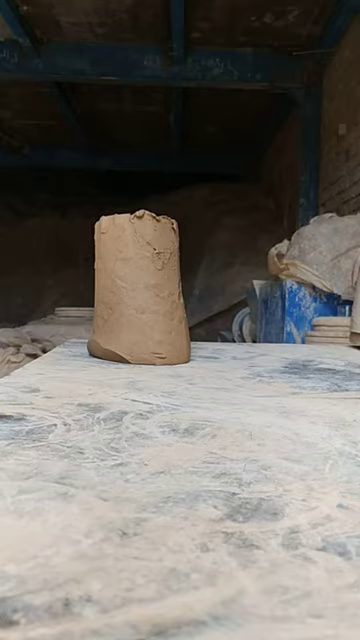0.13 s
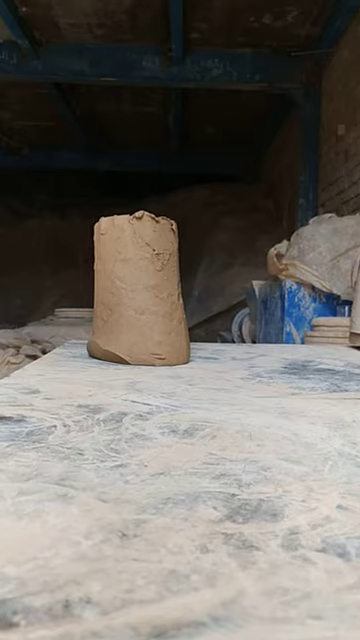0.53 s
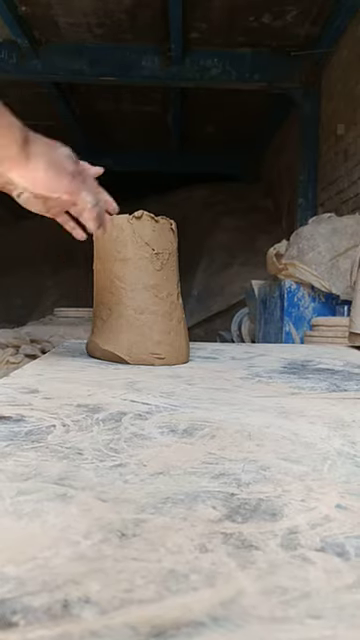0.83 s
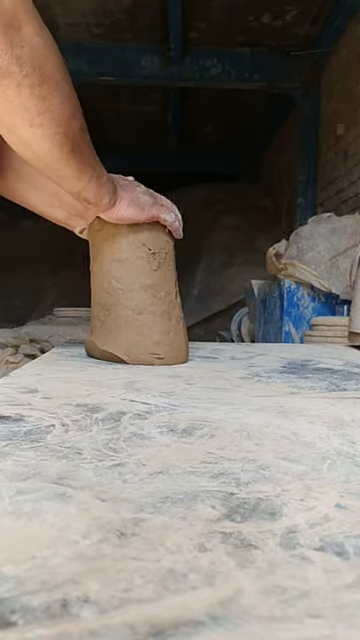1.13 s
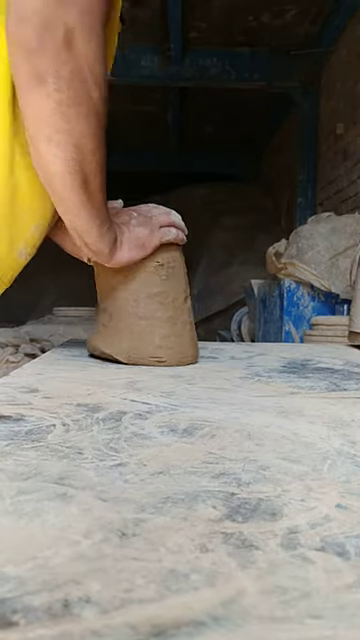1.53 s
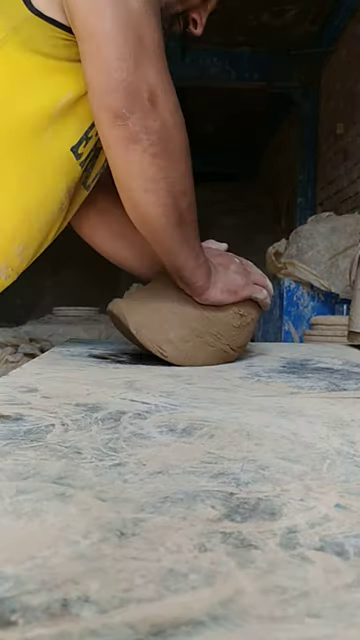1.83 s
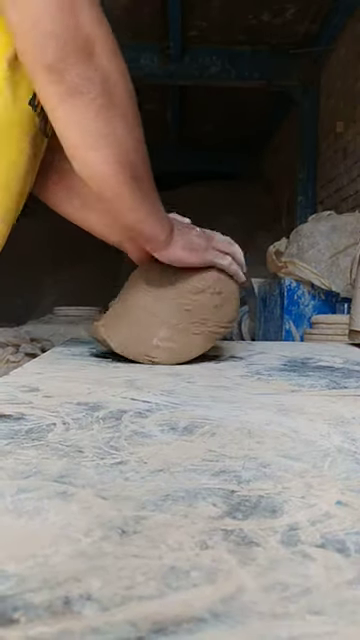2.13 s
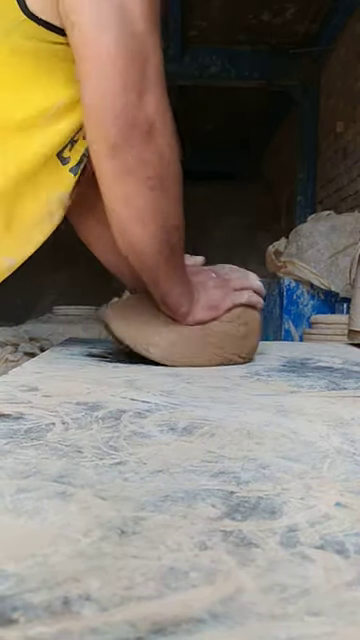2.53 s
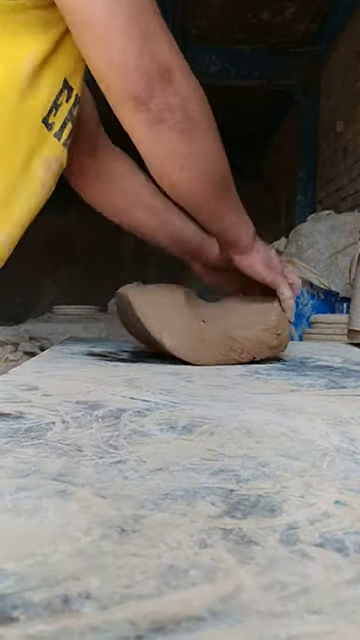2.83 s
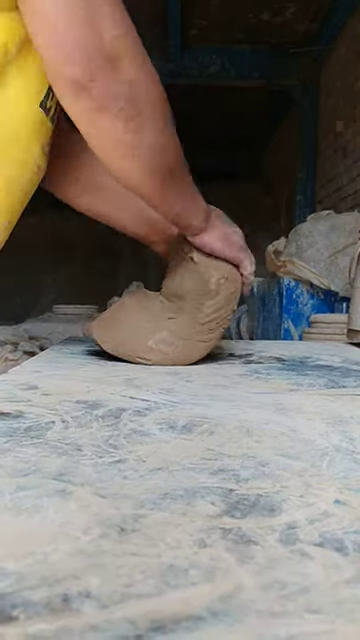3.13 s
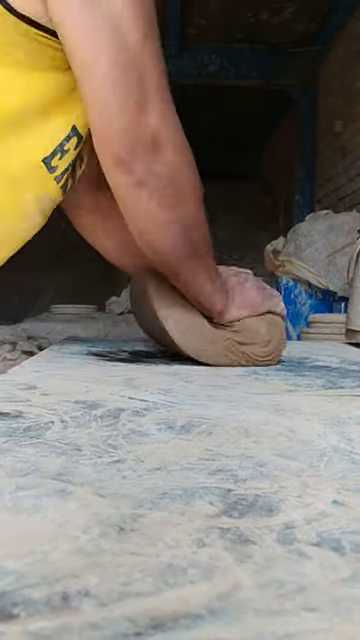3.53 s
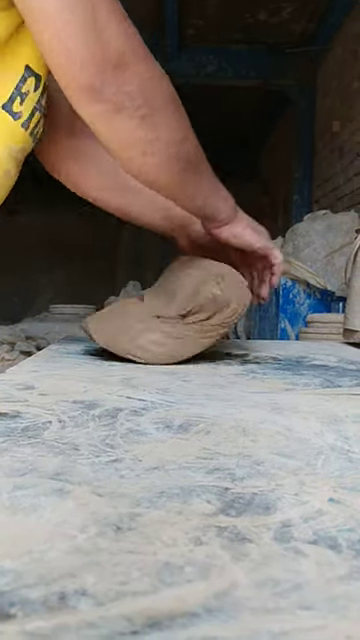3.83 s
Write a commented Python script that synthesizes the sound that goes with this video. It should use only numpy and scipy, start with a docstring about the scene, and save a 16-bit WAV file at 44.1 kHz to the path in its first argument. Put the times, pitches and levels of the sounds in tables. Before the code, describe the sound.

Wet clay being kneaded by hand, with soft pats and squelches over a low workshop hum.

```python
"""Kneading wet clay

Two hands knead a lump of wet clay on a table, which rumbles softly under the pushes.
Palms pat the lump and slide over it; the sticky clay squelches and lets go with small snaps.
Behind them a workshop hums and hisses steadily, cutting in after a moment of silence."""
import sys
import numpy as np
from scipy import signal
from scipy.fft import rfft, irfft
from scipy.io import wavfile

SR = 44100
rng = np.random.default_rng(int(sys.argv[2]) if len(sys.argv) > 2 else 0)


def persist_wave(psi):
    """Save psi, clipped to +-1, as 16-bit WAV."""
    counts = np.round(np.clip(psi, -1, 1) * 32767).astype(np.int16)
    wavfile.write(sys.argv[1], SR, np.atleast_2d(counts).T)


N = 176400

# How alike left and right are in the room: pitch_hz, likeness (1 = the same)
ROOM_LIKENESS = [(30, 1), (90, 0.81), (170, 0.94), (330, 0.69), (600, 0.42), (1200, 0.2), (3000, 0.064),
                 (12000, 0.033)]
# The tone of skin on clay: pitch_hz, level_db
SKIN_TONE = [(200, -1), (700, -1), (1500, -2), (3000, 0.5), (4500, 1), (6000, 0), (8800, 5), (9800, 3.5),
             (11000, -6), (14000, -16)]
HAND_LIKENESS = 0.12


def amp(db):
    """Turns decibels into a gain."""
    return 10 ** (np.asarray(db) / 20)


def unit(x):
    """Scales a signal to an average power of 1."""
    return x / np.sqrt(np.mean(x ** 2) + 1e-20)


def read(points, hz):
    """Reads between the rows of a table, on a scale of octaves."""
    pitches, values = np.transpose(points)
    return np.interp(np.log(hz + 1), np.log(pitches + 1), values)


def sides(pan_db):
    """Left and right gains of constant power; a positive pan_db is louder on the left."""
    return unit(amp(np.array([[pan_db], [-pan_db]]) / 2))


def add(mix, start_s, sound):
    """Lays a stereo sound into the mix."""
    part = mix[:, round(start_s * SR):][:, :sound.shape[1]]
    part += sound[:, :part.shape[1]]


def pair(noise, likeness):
    """Makes two unrelated channels partly alike."""
    return np.array([noise[0], likeness * noise[0] + np.sqrt(1 - likeness ** 2) * noise[1]])


def grit(size, per_s, spread_db, smooth_share):
    """Noise that is partly smooth, partly broken into tiny slips of uneven strength."""
    slipping = rng.random(size) < per_s / SR
    slips = slipping * amp(spread_db * np.minimum(rng.exponential(1, size), 3))
    noise = pair(rng.standard_normal((2, size)), HAND_LIKENESS)
    return noise * np.sqrt(smooth_share + (1 - smooth_share) * unit(slips) ** 2)


def stroke(t, half_rise, fall):
    """Swells up to time zero, then dies away."""
    return np.where(t < 0, np.cos(np.pi / 2 * t / (2 * half_rise)) ** 2, np.exp(-abs(t) / fall))


def workshop():
    """Steady room noise that hums in narrow bands, each with its own place from left to right."""
    # The broad noise of the room: pitch_hz, level_db (per Hz)
    air = [(15, -85), (80, -77), (125, -67), (200, -69), (280, -78.5), (330, -83), (430, -81.5), (540, -81),
           (680, -90), (1200, -92), (1800, -96), (2500, -99), (3100, -101), (3700, -103), (5400, -105),
           (6300, -108.5), (7100, -105), (8000, -103.5), (9600, -105), (10500, -113), (12500, -119),
           (14500, -121)]
    # Resonances in the hum and hiss: pitch_hz, half_width_hz, peak_db (per Hz), pan_db
    resonances = [(50.7, 20, -69, 0), (133, 27, -71.5, -6), (174.4, 6.4, -61, -6), (211.4, 4.3, -65.5, 0),
                  (242.3, 5.7, -70, 1), (307.5, 7.7, -71.5, -3.5), (337.8, 6.9, -71, 12),
                  (372.8, 6.3, -70, -13.5), (388.6, 8.9, -75, -20), (471.8, 18.6, -69, 1.5),
                  (1056, 63, -87, 13), (2614, 12, -91.5, -25), (2808, 21.5, -84.5, 0.5),
                  (2906, 112, -91, 0.5), (3270, 34, -90, 4), (4850, 190, -100, -2), (4970, 29, -91.5, -2),
                  (8480, 28, -89, -26), (8540, 390, -97.5, -10), (11400, 100, -112, 2)]
    hz = np.fft.rfftfreq(N, 1 / SR)
    power = amp(read(air, hz)) ** 2 * np.ones((2, 1))
    for pitch, half_width, db, pan_db in resonances:
        power += (amp(db) * sides(pan_db) / (1 + ((hz - pitch) / half_width) ** 2)) ** 2
    noise = pair(rfft(rng.standard_normal((2, N))), read(ROOM_LIKENESS, hz))
    return irfft(noise * np.sqrt(power * SR / 2), N)


def echo(sound, size=256):
    """The workshop's echo: a blurred tail in which the middle pitches last longest."""
    # How long the room rings: pitch_hz, fade_s (to fall by 60 dB)
    fade_times = [(300, 0.27), (2000, 1), (8000, 0.55), (14000, 0.58)]
    hz, t, noise = signal.stft(rng.standard_normal((2, SR // 2)), SR, nperseg=size)
    fade = amp(-60 * t / read(fade_times, hz)[:, None])
    tail = signal.istft(noise * fade, SR, nperseg=size)[1]
    return signal.fftconvolve(sound, tail / np.linalg.norm(tail[0]), axes=1)[:, :N]


def table_rumble():
    """The lump rolls under the body's weight and the table rumbles softly."""
    # Pushes on the lump: peak_s, half_length_s, level_db
    pushes = [(1.606, 0.1, -44), (2.11, 0.13, -48), (2.85, 0.11, -61), (3.445, 0.052, -50),
              (3.746, 0.18, -52.5)]
    # The tone of the table: pitch_hz, level_db
    table_tone = [(20, -22), (50, 0), (85, 1), (130, 7), (175, 15.5), (260, -5), (500, -11.5), (1200, -42),
                  (8000, -59)]
    t, hz = np.arange(N) / SR, np.fft.rfftfreq(N, 1 / SR)
    noise = pair(rfft(rng.standard_normal((2, N))), read(ROOM_LIKENESS, hz))
    rumble = unit(irfft(noise * amp(read(table_tone, hz)), N))
    weight = sum(amp(db) * np.exp(-.5 * ((t - peak) / half) ** 2) for peak, half, db in pushes)
    return rumble * weight


def friction(tilt_db, hollow_hz, boost_db, hollow_octaves=0.23, size=32768):
    """Skin slips on damp clay in tiny steps; the hollow under the palm shapes one band of the sound."""
    hz = np.fft.rfftfreq(size, 1 / SR)
    slips = grit(size, per_s=700, spread_db=2.5, smooth_share=0.65)
    hollow_db = boost_db / (1 + (np.log2((hz + 1) / hollow_hz) / hollow_octaves) ** 2)
    treble_db = tilt_db * np.log2(np.maximum(hz, 800))  # a negative tilt sounds duller
    tone = amp(read(SKIN_TONE, hz) + treble_db + hollow_db)
    return unit(irfft(rfft(slips) * tone, size))


def rubs():
    """Each slide of a palm swells with the push and fades as the palm stops."""
    # Slides: peak_s, half_rise_s, fall_s, level_db, tilt_db (per octave), pan_db, hollow_hz, boost_db
    slides = [(0.936, 0.02, 0.035, -54.5, -2.5, 2, 1500, 5), (1.203, 0.024, 0.05, -57.5, -5, 0, 1500, 7),
              (1.852, 0.031, 0.03, -51, -0.7, 3.5, 7300, 4), (1.964, 0.016, 0.069, -53, -2, 6.5, 3900, 1.5),
              (2.59, .052, 0.083, -52, -2.8, 3.5, 3570, 5), (2.70, 0.034, 0.019, -56.5, -5.5, -6, 3000, -1),
              (2.902, 0.053, .05, -57.5, 1.5, -3, 9500, 1), (2.981, .03, 0.017, -54.5, -8.5, 1, 1500, 5),
              (3.221, 0.012, 0.027, -55, -12, 5, 9200, 17), (3.67, .045, 0.09, -55.5, -5, -3, 8700, 8),
              (3.9, 0.12, 0.36, -59.5, -5, 3, 1280, 7)]
    out = np.zeros((2, N))
    for peak, half_rise, fall, db, tilt_db, pan_db, hollow_hz, boost_db in slides:
        sound = friction(tilt_db, hollow_hz, boost_db)
        t = np.arange(sound.shape[1]) / SR - 2 * half_rise
        add(out, peak - 2 * half_rise, sound * stroke(t, half_rise, fall) * amp(db) * sides(pan_db))
    return out


def pats(rise_s=0.0013):
    """A palm lands: a quick burst of friction that the clay damps at once."""
    # Landings: start_s, fall_s, level_db, tilt_db (per octave), pan_db, hollow_hz, boost_db
    landings = [(0.901, 0.0063, -45, -5, 5, 7000, 6), (1.169, 0.018, -51, -5, -1, 940, 11.5),
                (1.8, 0.018, -47.5, -2.3, 6, 2860, 6), (2.031, 0.013, -45.5, -2.5, 5, 4040, 3.5),
                (2.217, 0.0097, -48.5, -2.5, 2, 7500, 6), (3.185, 0.02, -50.5, -6.5, -4, 780, 7),
                (3.207, 0.0091, -44.5, 5, -5, 9500, 3), (3.23, 0.014, -50, 2.5, 2, 1500, 6),
                (3.472, 0.022, -57, -2.5, -1, 6630, 5), (3.991, 0.0055, -41, -3, -3, 1400, 9),
                (3.9955, 0.0024, -30, -3, -16, 1110, 9)]
    out = np.zeros((2, N))
    for start, fall, db, tilt_db, pan_db, hollow_hz, boost_db in landings:
        sound = friction(tilt_db, hollow_hz, boost_db)
        t = np.arange(sound.shape[1]) / SR
        shape = np.minimum(t / rise_s, 1) * np.exp(-t / fall)
        add(out, start, sound * shape * amp(db) * sides(pan_db))
    return out


def snaps(rise_s=0.0004, size=4096):
    """Sticky clay lets go: a wet film tears with a very short burst of noise in one band."""
    # Tearing films: start_s, level_db, pitch_hz, half_width_octaves, fall_s, pan_db
    tears = [(0.902, -53, 13000, 0.38, .003, 6), (1.954, -55, 3900, .25, 0.005, 4),
             (2.035, -45, 3400, 0.71, .003, 2), (2.194, -48, 1440, 0.45, 0.0027, 6),
             (2.592, -54, 2290, 0.66, 0.0038, 17), (2.876, -33.5, 6500, 2.6, 0.00044, 15),
             (2.876, -54, 2200, 0.78, 0.0035, 5), (2.876, -43.5, 8700, 0.42, 0.0037, 3),
             (3.186, -39, 7400, 0.2, 0.0024, -12), (3.1886, -26.5, 7200, 0.27, 0.00014, -8),
             (3.1873, -46.5, 1200, 0.56, 0.0061, -5), (3.76, -48.5, 2000, 0.27, 0.0044, -5)]
    out, t, hz = np.zeros((2, N)), np.arange(size) / SR, np.fft.rfftfreq(size, 1 / SR)
    for start, db, pitch, half_width, fall, pan_db in tears:
        band = np.exp(-.5 * (np.log2((hz + 1) / pitch) / half_width) ** 2) * amp(read(SKIN_TONE, hz))
        shape = np.minimum(t / rise_s, 1) * np.exp(-np.maximum(t - rise_s, 0) / fall)
        noise = pair(rng.standard_normal((2, size)), HAND_LIKENESS)
        burst = irfft(rfft(noise) * band, size) * shape
        burst *= np.linalg.norm(shape) / np.linalg.norm(burst, axis=1, keepdims=True)
        add(out, start, burst * amp(db) * sides(pan_db))
    return out


def squelches(size=16384):
    """Tiny wet bursts ring a pocket between palm and clay, whose pitch slides as it changes shape."""
    # Squeezes of wet clay:
    # peak_s, half_rise_s, fall_s, level_db, pitch_hz (at the peak), glide_octaves_per_s, width_hz, pan_db
    squeezes = [(1.851, .012, 0.012, -57, 2720, -2, 1400, 2),
                (2.602, .028, 0.035, -53.5, 2430, -8, 1300, 6), (2.60, 0.013, .03, -59, 1540, -4, 600, 6),
                (3.212, 0.011, 0.022, -54, 1500, 9, 1500, -1), (3.681, .04, 0.052, -64, 6000, -1, 1000, -3),
                (3.765, 0.0069, 0.019, -55, 1860, -2, 900, -2)]
    out = np.zeros((2, N))
    for peak, half_rise, fall, db, pitch, glide, width, pan_db in squeezes:
        t = np.arange(size) / SR - 2 * half_rise
        bursts = grit(size, per_s=990, spread_db=-2, smooth_share=0.38)
        sliding_tone = np.exp(2j * np.pi * np.cumsum(pitch * 2 ** (glide * t)) / SR)
        decay = np.exp(-np.pi * width / SR)
        # Shift the pocket's pitch down to zero, smooth, and shift back: a ring that follows the slide.
        smoothed = signal.lfilter([1], [1, -2 * decay, decay * decay], bursts / sliding_tone)
        ring = unit((sliding_tone * smoothed).real)
        add(out, peak - 2 * half_rise, ring * stroke(t, half_rise, fall) * amp(db) * sides(pan_db))
    return out


def scene():
    """The hands, their echo and the table over the room noise."""
    hands = rubs() + squelches() + pats() + snaps()
    return hands + amp(-9.5) * echo(hands) + table_rumble() + workshop()


def record(dry):
    """The sound cuts in after a short silence, and its highest treble is removed."""
    silence_s, rise_s, top_hz = 0.3443, 0.039, 14600
    fade_in = np.clip((np.arange(N) / SR - silence_s) / rise_s, 0, 1) ** .5
    low_pass = signal.firwin(511, top_hz, window=("kaiser", 9), fs=SR)
    return signal.oaconvolve(dry * fade_in, low_pass[None], "same")


dry = scene()
out = record(dry)
persist_wave(out)
```